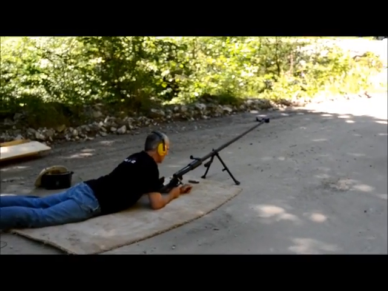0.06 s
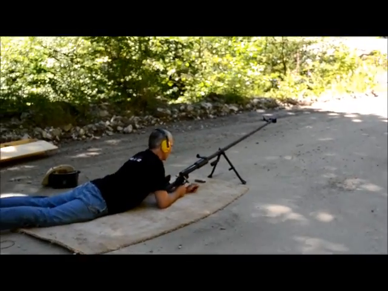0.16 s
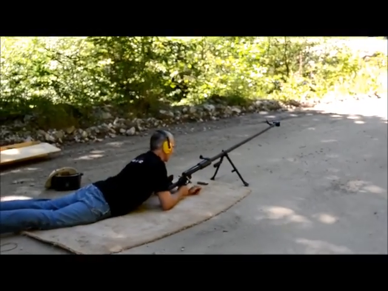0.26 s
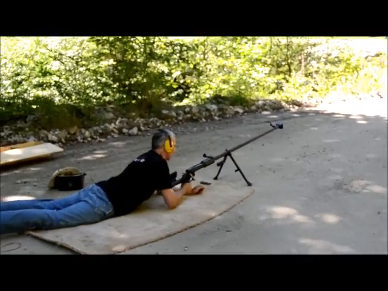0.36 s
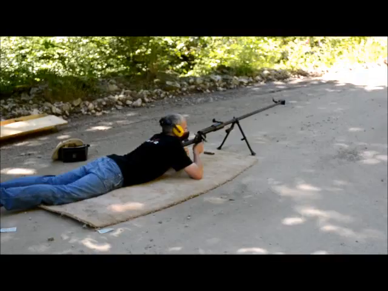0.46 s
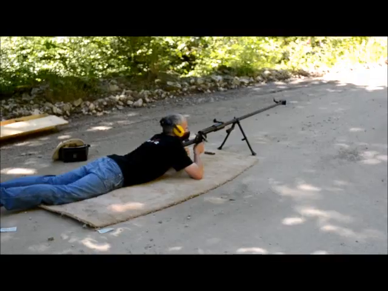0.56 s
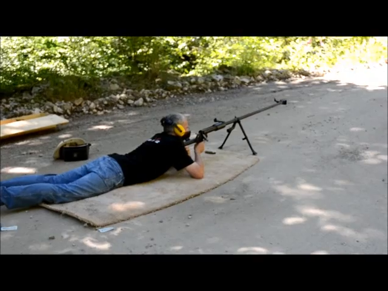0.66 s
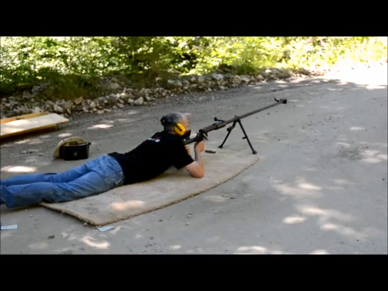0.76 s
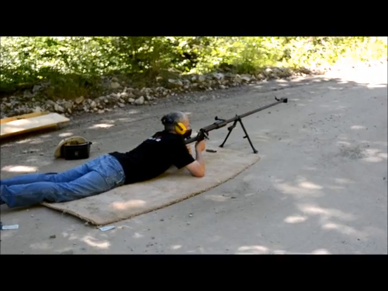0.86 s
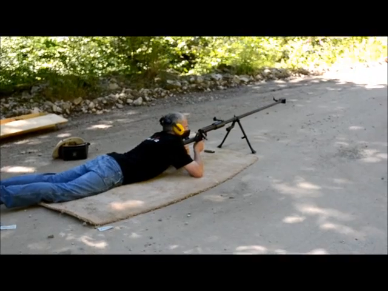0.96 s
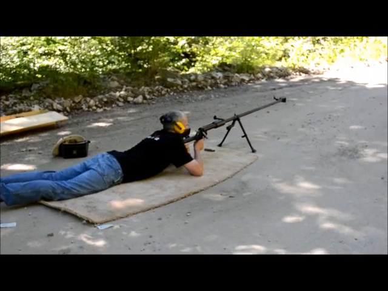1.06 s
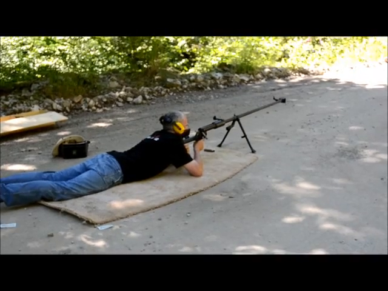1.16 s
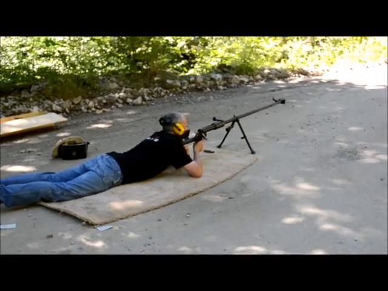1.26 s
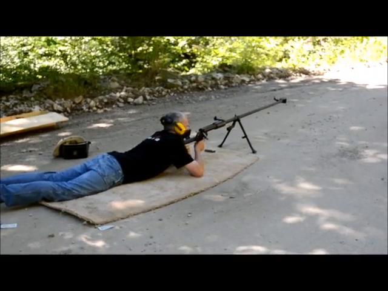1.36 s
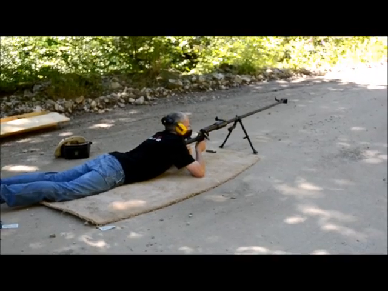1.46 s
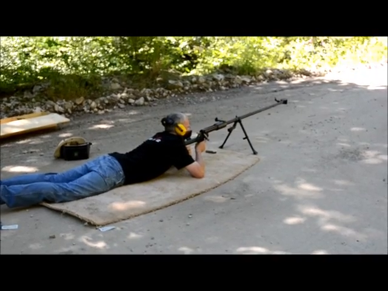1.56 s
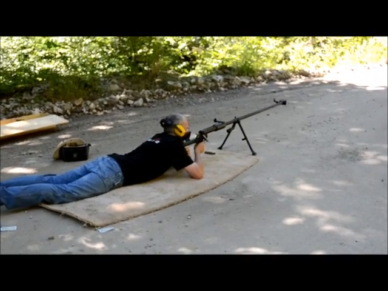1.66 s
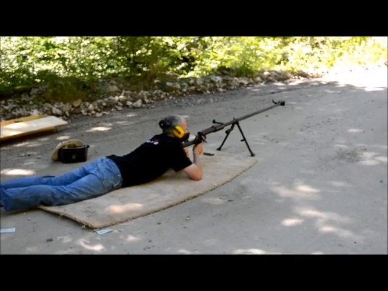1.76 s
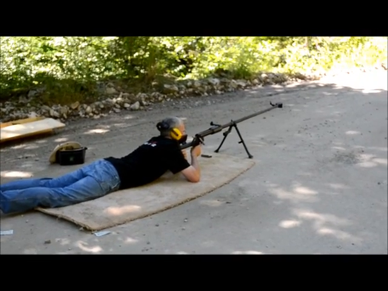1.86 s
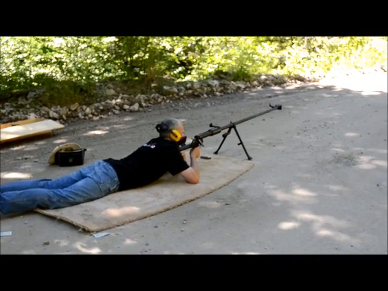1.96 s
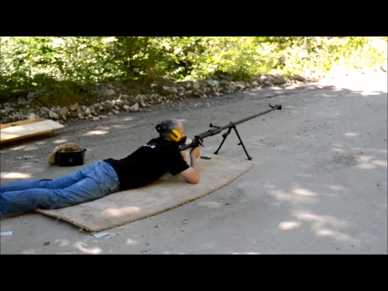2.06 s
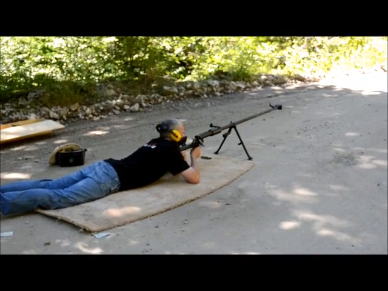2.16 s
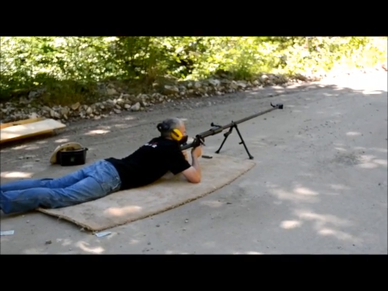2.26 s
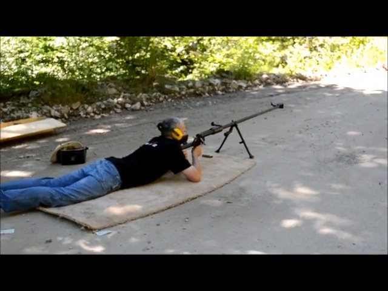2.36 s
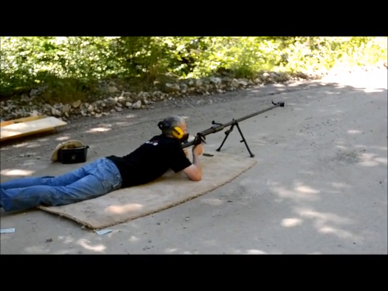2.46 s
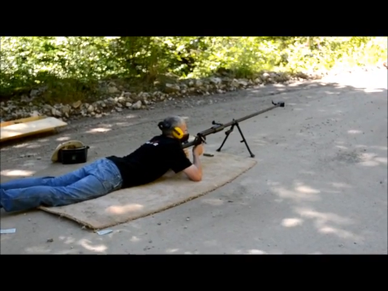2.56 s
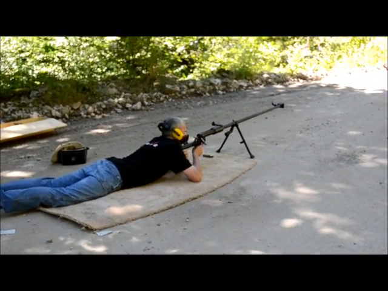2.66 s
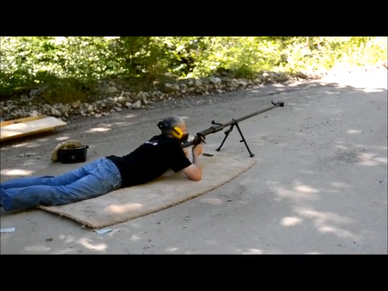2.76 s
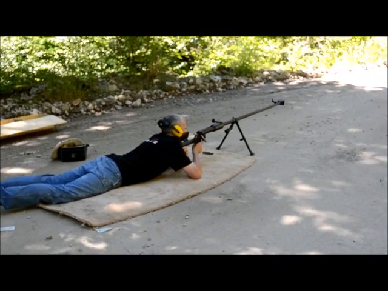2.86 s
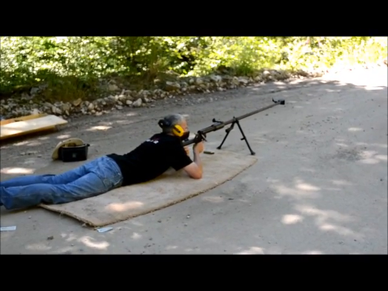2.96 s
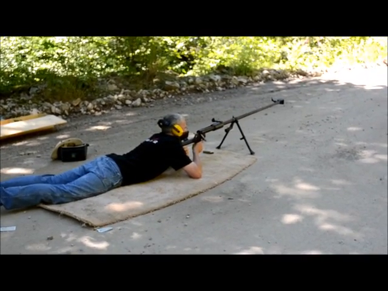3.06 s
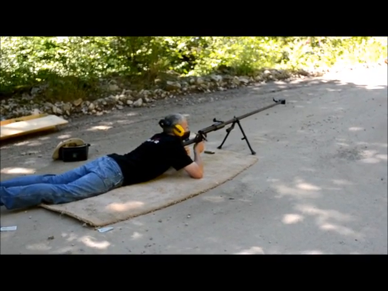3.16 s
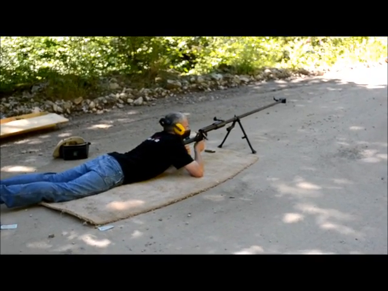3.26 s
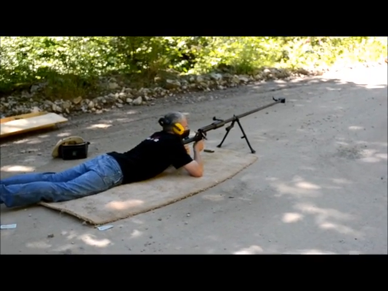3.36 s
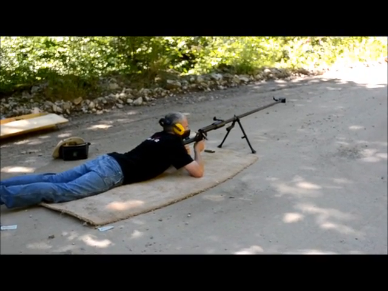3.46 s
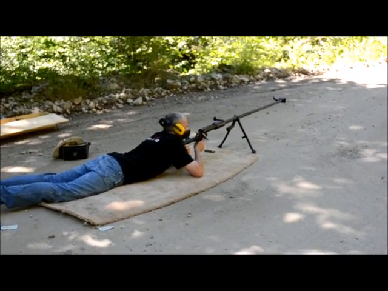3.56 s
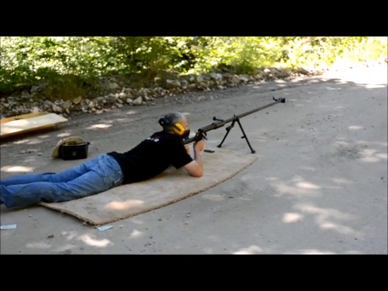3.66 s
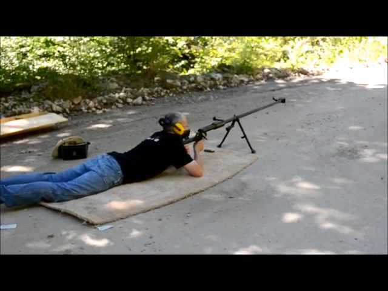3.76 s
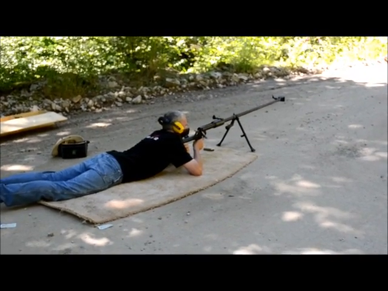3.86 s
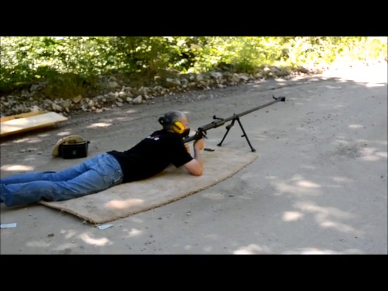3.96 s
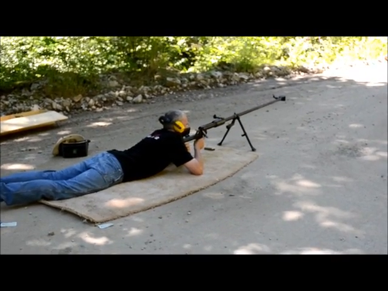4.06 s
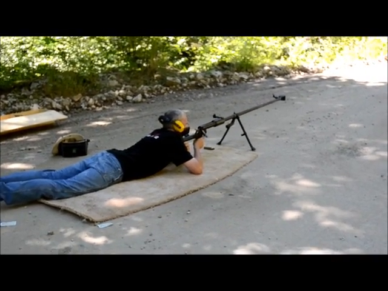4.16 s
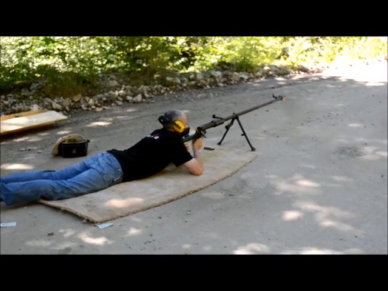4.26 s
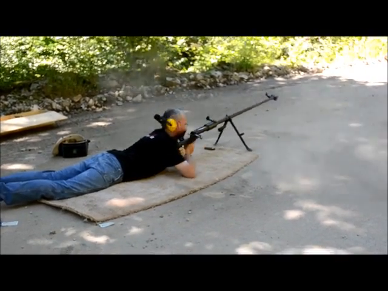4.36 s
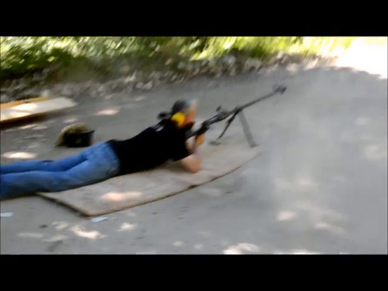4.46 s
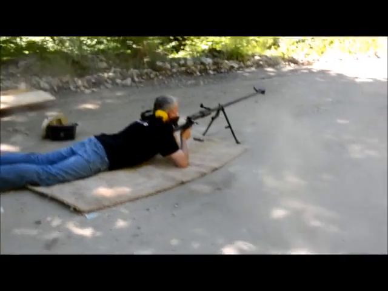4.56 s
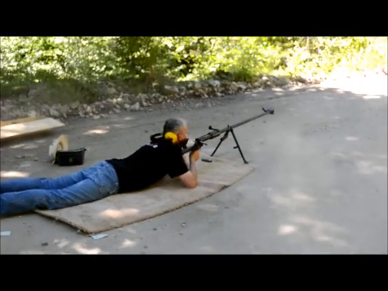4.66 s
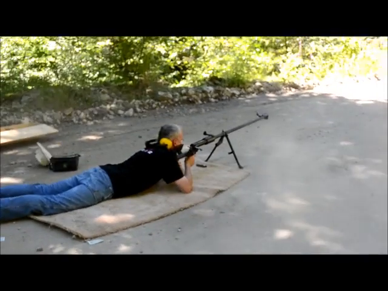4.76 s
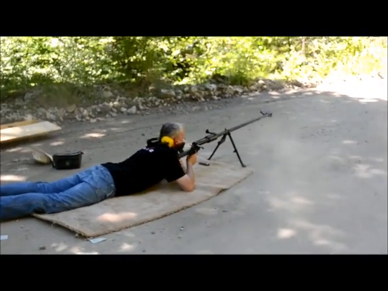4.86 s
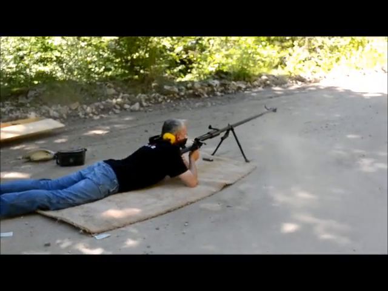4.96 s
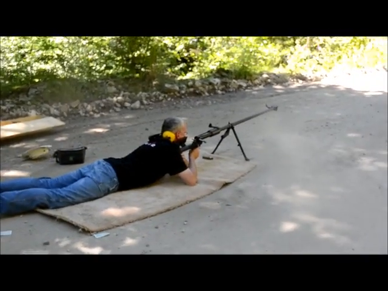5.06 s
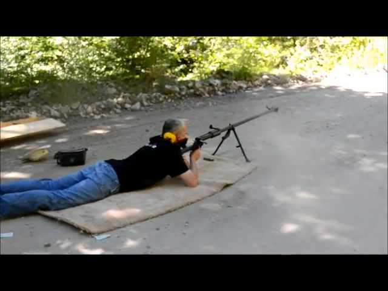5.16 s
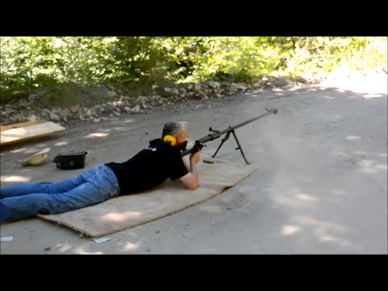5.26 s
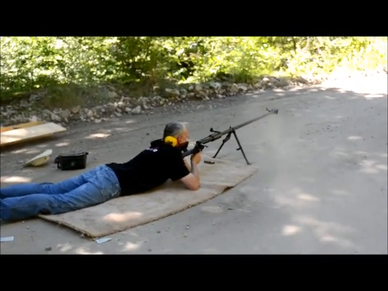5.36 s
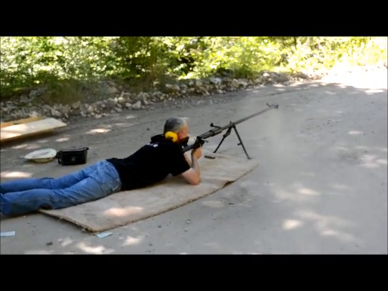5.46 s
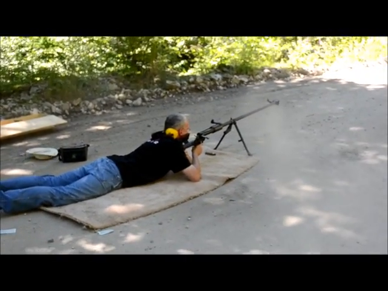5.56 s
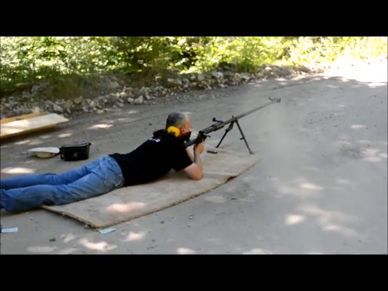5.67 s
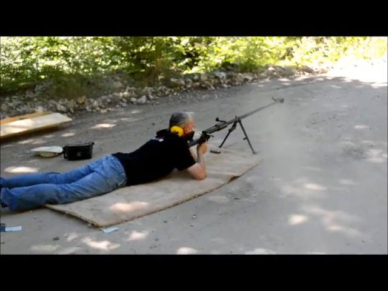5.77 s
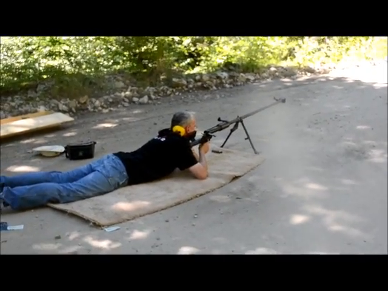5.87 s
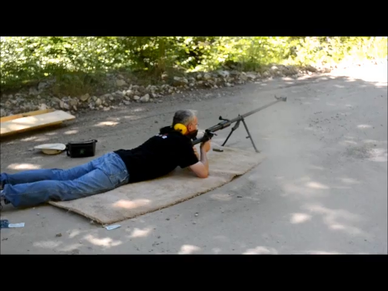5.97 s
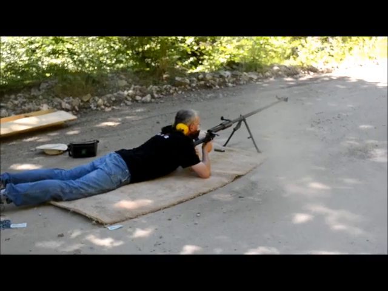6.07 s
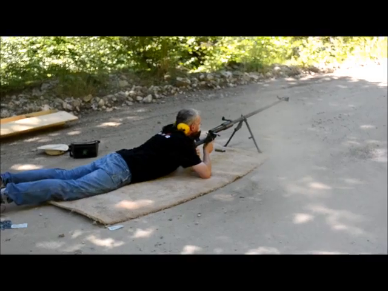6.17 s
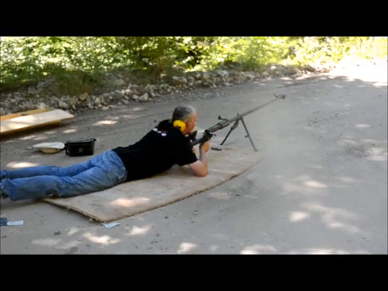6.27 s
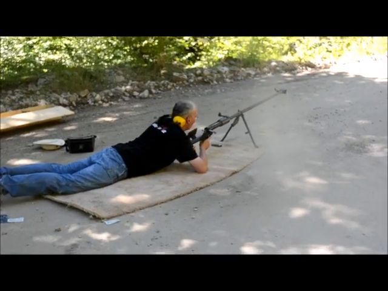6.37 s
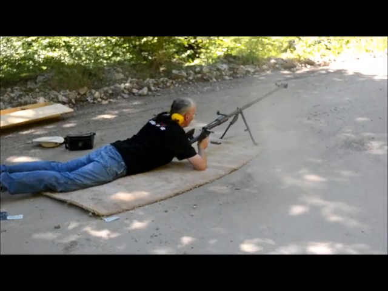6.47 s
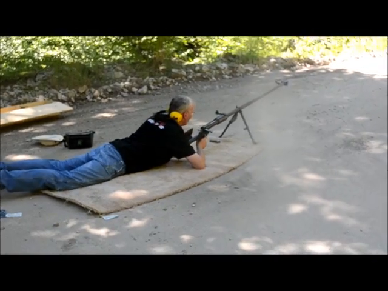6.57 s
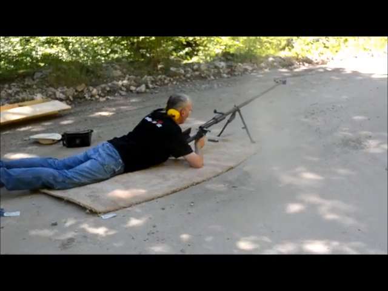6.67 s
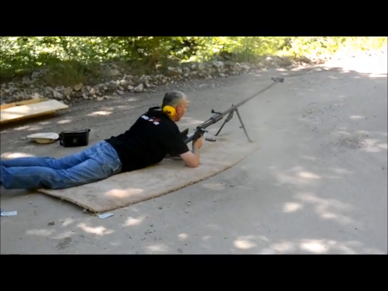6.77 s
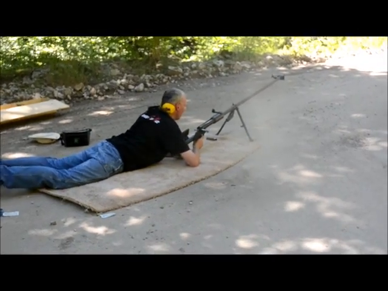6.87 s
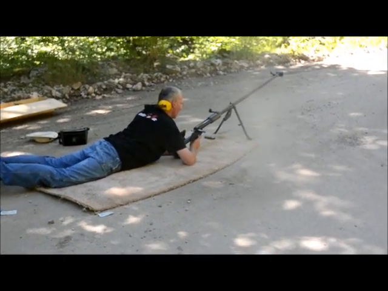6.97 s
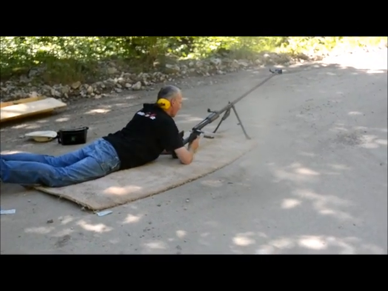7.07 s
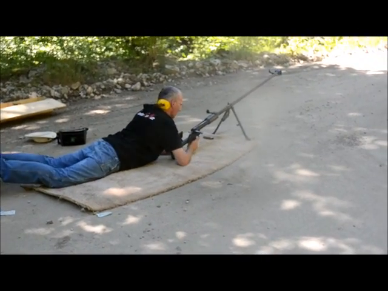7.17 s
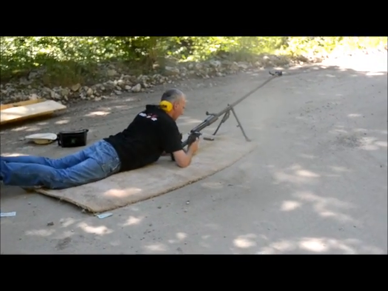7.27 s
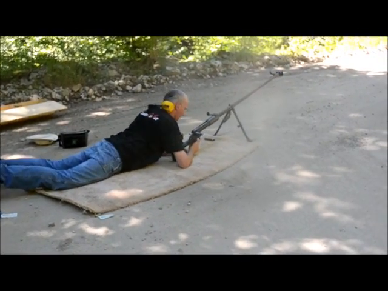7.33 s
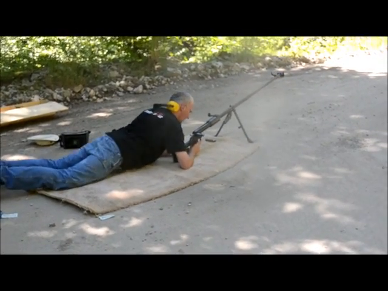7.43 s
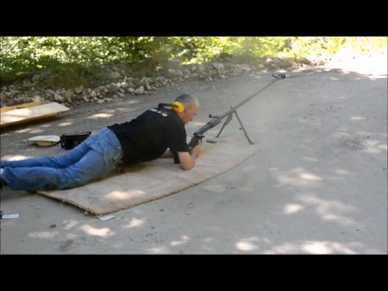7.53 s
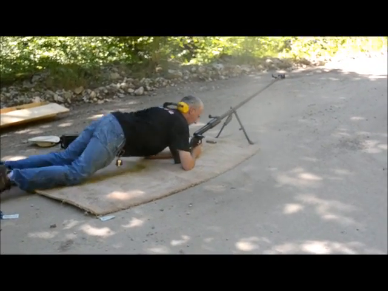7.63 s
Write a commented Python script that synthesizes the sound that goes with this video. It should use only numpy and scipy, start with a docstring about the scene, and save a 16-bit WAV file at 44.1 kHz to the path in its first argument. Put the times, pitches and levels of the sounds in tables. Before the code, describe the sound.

One very loud shot from a heavy rifle breaks an even outdoor hiss, after some very faint low bumps and a few seconds of waiting. The sharp crack and boom briefly distort a small nearby microphone. Quick echoes slap back from the surrounding woods, then a rolling tail darkens and fades, swelling softly once more from far away. Two light metallic ticks close as the rifle is handled.

```python
"""A gravel range in a wood: one shot from a heavy rifle, over a steady hiss.
Soft bumps come as the shooter settles. Then the crack and muzzle blast overload a small microphone;
trees and slopes scatter the shot back for three seconds, ever duller, with a second swell from far away.
Two faint metal ticks follow as the rifle is handled."""
import sys
import numpy as np
from scipy import signal
from scipy.fft import rfft, irfft
from scipy.io import wavfile
from scipy.ndimage import uniform_filter1d

SR = 44100
rng = np.random.default_rng(int(sys.argv[2]) if len(sys.argv) > 2 else 0)


def master_out(mix):
    """Clip the mix to full scale and print it as 16-bit PCM to the path in sys.argv[1]."""
    frames = np.transpose(np.atleast_2d(mix))
    ceiling = np.clip(frames, -1, 1)
    pcm = np.round(ceiling * 32767).astype(np.int16)
    wavfile.write(sys.argv[1], SR, pcm)


N = 339567
TIME = np.arange(N) / SR
SHOT_S = 4.3453

# tone of the background bed: freq_hz, relative_db
HISS_EQ = [(30, -32), (65, -24), (110, -17.5), (200, -11.5), (330, -6.5), (480, -8), (760, 0.0), (1020, -3),
           (1350, 0.0), (2650, -2.5), (3300, -5.5), (5800, -10.0), (7500, -15), (9600, -14)]
# handling, low bumps then light metal ticks: start_s, peak_db, pitch_hz, swell_s
HANDLING_HITS = [(.015, -53, 125, .008), (.128, -53, 55, .016), (.158, -52, 95, .006),
                 (.724, -61, 100, .008), (.842, -61, 80, .007), (7.361, -33, 9500, .0003),
                 (7.635, -24, 9950, .00025)]
# tone of the echo off the nearest trees: freq_hz, relative_db
TREE_EQ = [(30, -37), (60, -32), (110, -18), (170, -7), (280, 0.5), (430, -4.5), (680, 0.0), (1050, -1.0),
           (1400, 0), (2000, -0.5), (3500, -5.5), (6000, -10.0), (8200, -13.5), (10000, -11)]
# how air and leaves darken the echo as it travels: freq_hz, loss_db_per_s
AIR_LOSS = [(40, 7), (110, 1), (170, 1), (280, 2), (450, 2.5), (750, 3), (1400, 6), (2000, 8.5), (3500, 13),
            (6000, 21.5), (10000, 40)]
# land that answers the shot: the nearest trees, a bank, the back of the wood, a far slope,
# a duller thud within it, and a last low grumble from the hills:
# full_at_s, level_db, swell_db_per_s, hold_s, fade_db_per_s, bass_db
LAND_RETURNS = [(4.382, -11.1, 42, .16, 39, -1), (4.72, -15.5, 40, .05, 20, 5.5),
                (5.049, -15.5, 18, .11, 37.5, -6), (6.153, -30, 7.5, .26, 11.5, -0.5),
                (6.13, -36.5, 150, .06, 90, 5), (7.08, -43.5, 16, .22, 21, 10)]
# single echoes that stand out, the first from the ground and bank close by: start_s, peak_db, push_ms
SLAP_ECHOES = [(4.3532, -2.5, 0.37), (4.3563, -6, .2), (4.36, -4, 0.26), (4.3613, -6, 0.32),
               (4.3655, -3.5, 0.26), (4.37, 2, 0.29), (4.510, 0, 0.17), (4.754, -1, 0.48),
               (4.807, 0.5, 0.34)]
# pressure bursts of the shot, crack, blast and boom:
# start_s, peak_rms_db, rise_s, decay_s, length_s, centre_hz, width_octaves
SHOT_BURSTS = [(4.3443, -5.5, 0.0044, 0.015, 0.029, 8200, 1), (4.3477, -6.5, 0.0033, 0.015, 0.024, 1750, 1),
               (4.3693, -8, .0015, 0.016, .03, 700, 0.63)]


def amp(db):
    """Decibels to gain."""
    return 10 ** (np.asarray(db) / 20)


def unit_rms(x):
    """Scales to rms 1."""
    return x / np.sqrt(np.mean(x ** 2) + 1e-20)


def curve_at(points, hz):
    """Reads a curve on a log-frequency axis."""
    f, value = np.transpose(points)
    return np.interp(np.log(hz + 1), np.log(f + 1), value)


def eq(x, gain):
    """Filters x by a gain that is a function of frequency."""
    return irfft(rfft(x) * gain(np.fft.rfftfreq(len(x), 1 / SR)), len(x))


def place(mix, start_s, sound):
    """Drops a sound into the mix."""
    part = mix[round(start_s * SR):][:len(sound)]
    part += sound[:len(part)]


def hiss_bed(level_db=-36.5, waver_db=0.22):
    """An even, far-off rush that barely wavers."""
    rush = unit_rms(eq(rng.standard_normal(N), lambda f: amp(curve_at(HISS_EQ, f))))
    waver = unit_rms(eq(rng.standard_normal(N), lambda f: np.exp(-f / 6)))
    return amp(level_db + waver_db * waver) * rush


def handling():
    """Each contact swells and dies quickly: low for the body on the mat, high for metal."""
    out, t = np.zeros(N), np.arange(SR // 5) / SR
    for start_s, peak_db, pitch_hz, swell_s in HANDLING_HITS:
        envelope = t / swell_s * np.exp(1 - t / swell_s)
        place(out, start_s, amp(peak_db) * envelope * np.sin(2 * np.pi * pitch_hz * t))
    return out


def land_response(hz, t, bass_hz=260):
    """Each stretch of land swells in, holds as the blast sweeps across it, and fades; distance dulls it."""
    travel_s = np.maximum(t - SHOT_S, 0)
    tone_db = curve_at(TREE_EQ, hz)[:, None] - curve_at(AIR_LOSS, hz)[:, None] * travel_s
    bass_shelf = 1 / (1 + (hz[:, None] / bass_hz) ** 4)
    power = 0
    for full_at_s, level_db, swell, hold_s, fade, bass_db in LAND_RETURNS:
        early_s, late_s = np.maximum(full_at_s - t, 0), np.maximum(t - full_at_s - hold_s, 0)
        envelope = amp(level_db - swell * early_s - fade * late_s)
        tone = amp(tone_db + bass_db * bass_shelf) ** 2
        power = power + envelope ** 2 * tone / tone.mean(axis=0)
    return np.sqrt(power)


def rolling_tail(scatter_db=1.94, patchy_db=0.38, fade_in_s=0.037, echoes_per_s=9000):
    """Thousands of small echoes of uneven size; the later ones have come further and lost their treble."""
    sizes = amp(scatter_db * np.minimum(rng.exponential(1, N), 5)) * rng.choice([-1, 1], N)
    echoes = unit_rms(sizes * (rng.random(N) < echoes_per_s / SR))
    hz, t, spectrum = signal.stft(echoes, SR, nperseg=1024, noverlap=768)
    # each clump of trees returns its own patch of the spectrum
    patches = uniform_filter1d(rng.standard_normal(spectrum.shape), size=16, axis=0)
    patches = unit_rms(uniform_filter1d(patches, size=6, axis=1))
    shaped = spectrum * land_response(hz, t) * amp(patchy_db * patches)
    _, wash = signal.istft(shaped, SR, nperseg=1024, noverlap=768)
    return wash[:N] * np.clip((TIME - SHOT_S) / fade_in_s, 0, 1)


def slapback(low_hz=250, high_hz=2800):
    """Hard faces return the blast wave whole: a sharp push and a longer suck, dulled by distance."""
    out, ms = np.zeros(N), 1000 * np.arange(SR // 40) / SR
    path = signal.butter(2, [low_hz, high_hz], "bandpass", fs=SR, output="sos")
    for start_s, peak_db, push_ms in SLAP_ECHOES:
        pulse = (1 - ms / push_ms) * np.exp(-ms / push_ms)
        slap = signal.sosfilt(path, pulse)
        place(out, start_s, amp(peak_db) * slap / abs(slap).max())
    return out


def rifle_shot(release_s=.003):
    """Bright crack, muzzle blast, then a low boom off the bank: turbulent bursts that swell, sag and stop."""
    out, t = np.zeros(N), np.arange(SR // 4) / SR
    for start_s, peak_rms_db, rise_s, decay_s, length_s, centre_hz, octaves in SHOT_BURSTS:
        noise = rng.standard_normal(len(t))
        gas = eq(noise, lambda f: np.exp(-.5 * (np.log2((f + 1) / centre_hz) / octaves) ** 2))
        attack = np.sqrt(np.minimum(t / rise_s, 1))
        sag = np.exp(-np.maximum(t - rise_s, 0) / decay_s)
        gate = np.clip((length_s - t) / release_s, 0, 1)
        place(out, start_s, amp(peak_rms_db) * attack * sag * gate * unit_rms(gas))
    return out


def scene():
    """The shot, its echoes, the handling and the bed, in mono."""
    return (rifle_shot() + rolling_tail() + slapback() + handling() + hiss_bed())[None]


def record(dry, notch_hz=7900, notch_width_hz=200, notch_db=5, top_hz=10200, ceiling=1.0, cutoff_hz=11600):
    """The microphone port cuts a notch and the top end; the loudest peaks overload; a low-pass follows."""
    def port(f):
        notch = amp(-notch_db * np.exp(-((f - notch_hz) / notch_width_hz) ** 2))
        return notch / np.sqrt(1 + (f / top_hz) ** 52)
    coloured = eq(dry[0], port)
    clipped = coloured / (1 + (coloured / ceiling) ** 8) ** (1 / 8)
    lowpass = signal.firwin(301, cutoff_hz, window=("kaiser", 8), fs=SR)
    return signal.oaconvolve(clipped, lowpass, "same")[None]


dry = scene()
out = record(dry)
master_out(out)
```